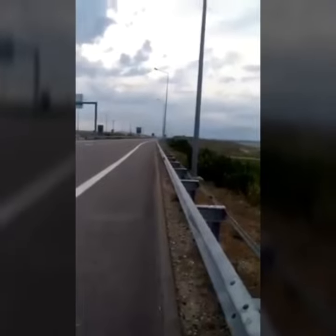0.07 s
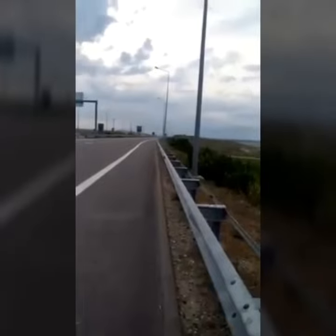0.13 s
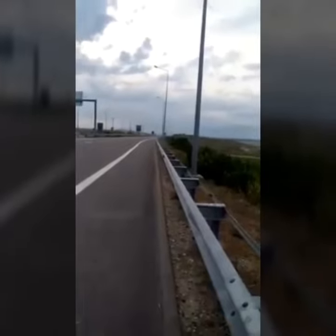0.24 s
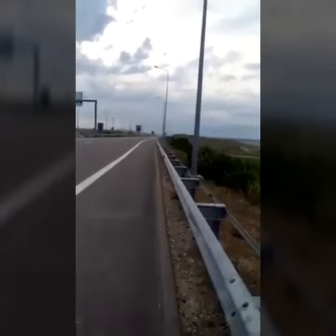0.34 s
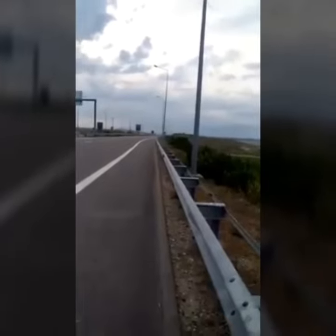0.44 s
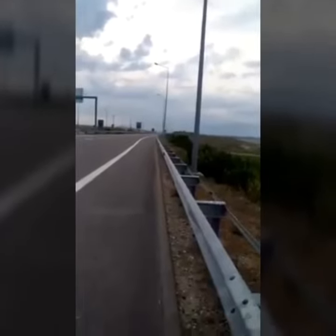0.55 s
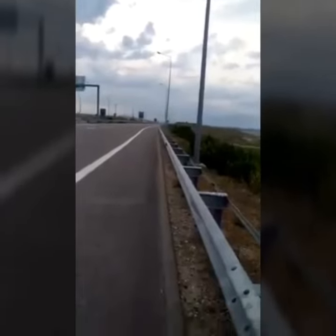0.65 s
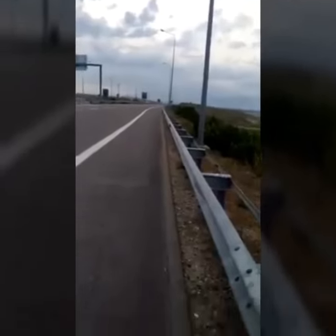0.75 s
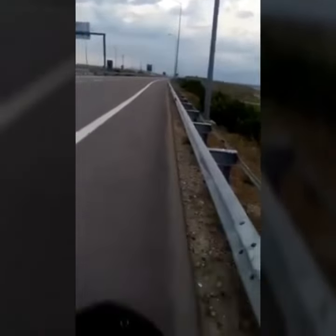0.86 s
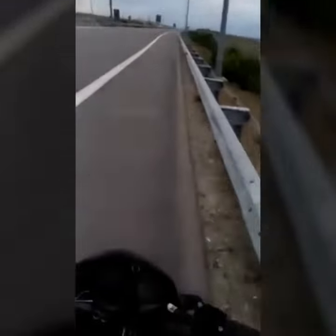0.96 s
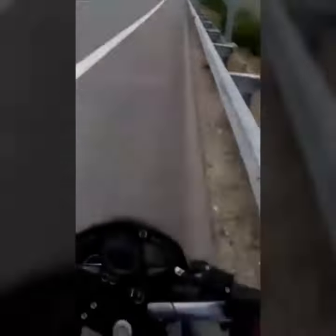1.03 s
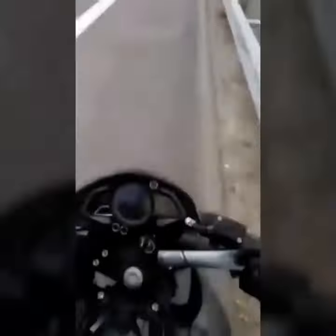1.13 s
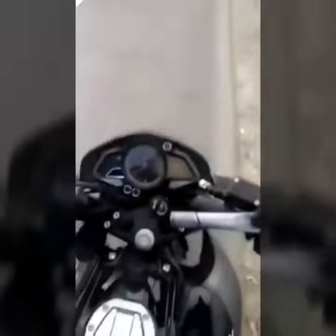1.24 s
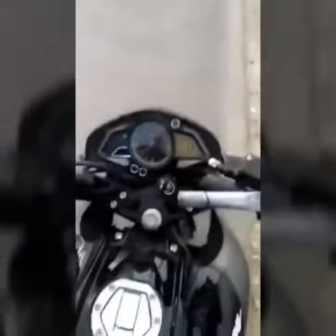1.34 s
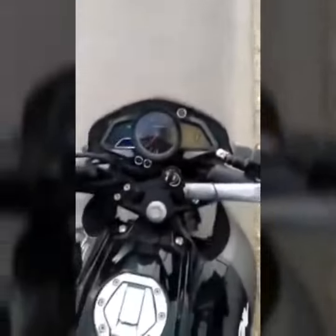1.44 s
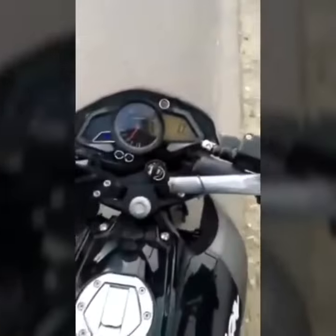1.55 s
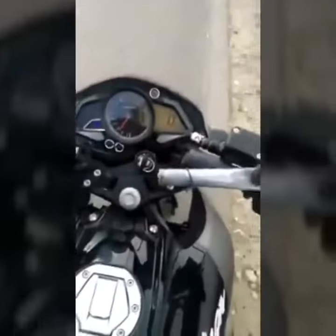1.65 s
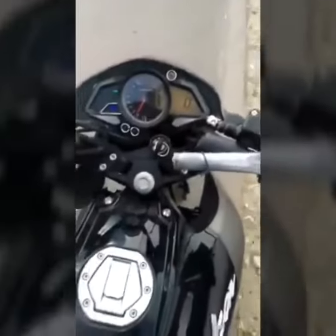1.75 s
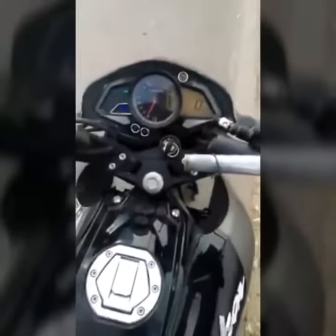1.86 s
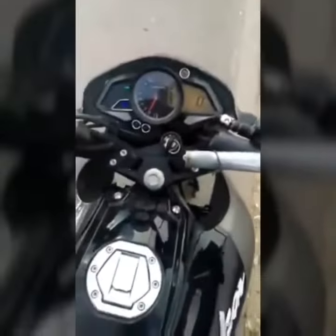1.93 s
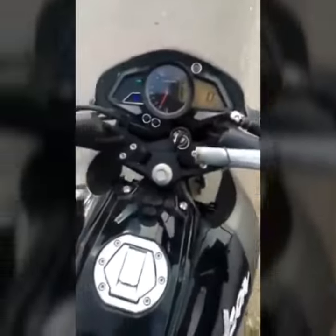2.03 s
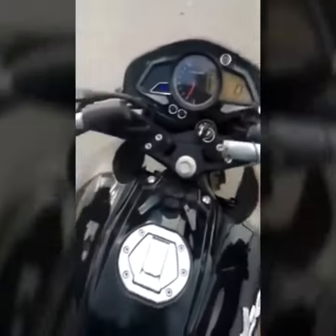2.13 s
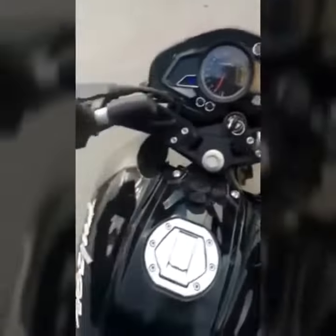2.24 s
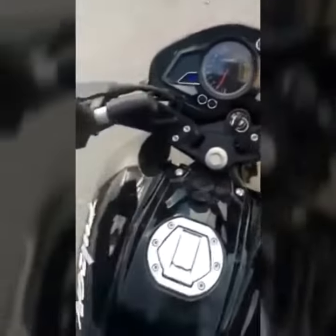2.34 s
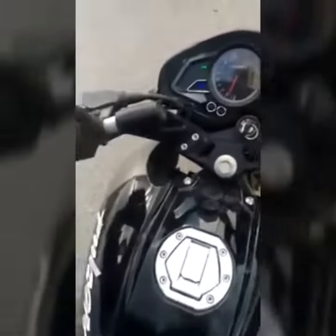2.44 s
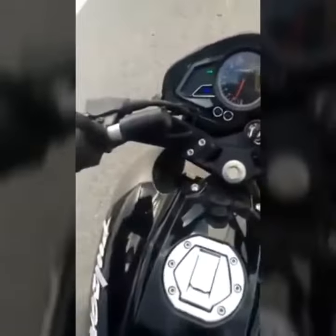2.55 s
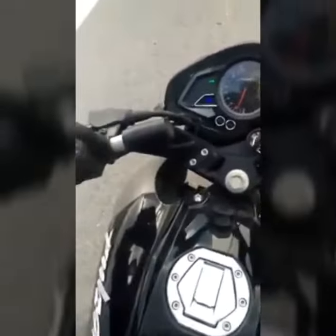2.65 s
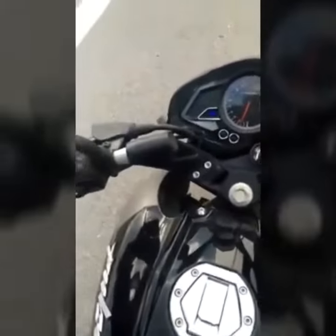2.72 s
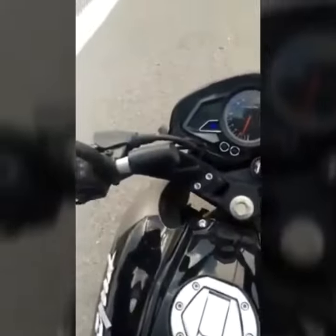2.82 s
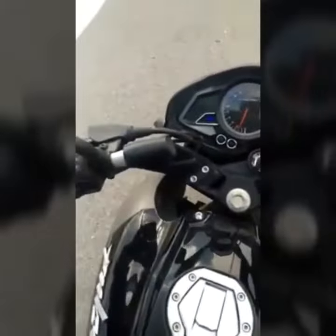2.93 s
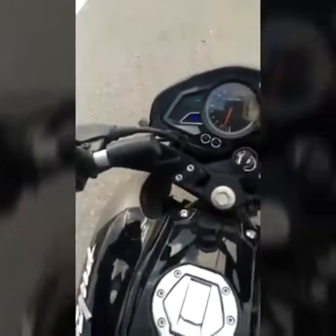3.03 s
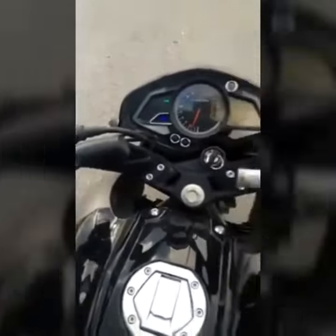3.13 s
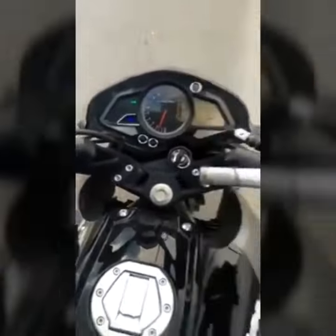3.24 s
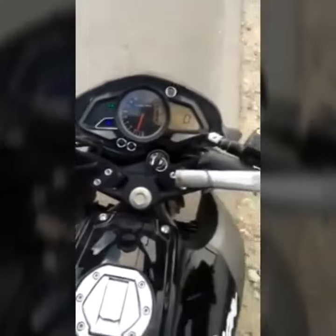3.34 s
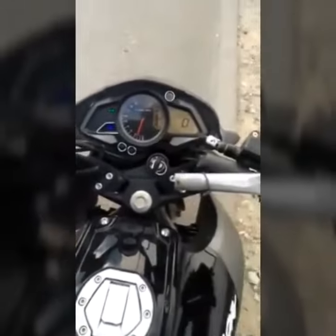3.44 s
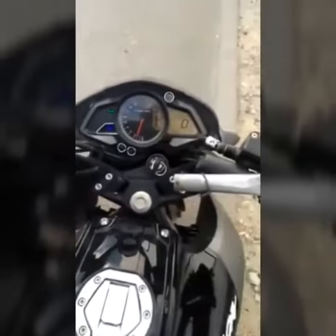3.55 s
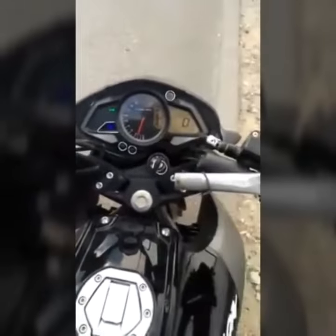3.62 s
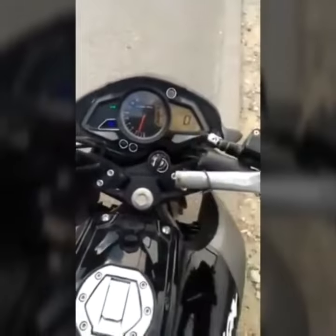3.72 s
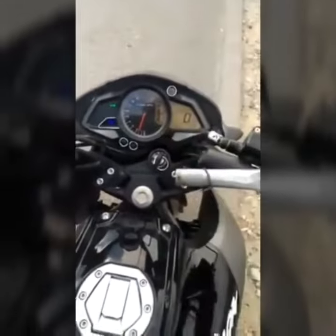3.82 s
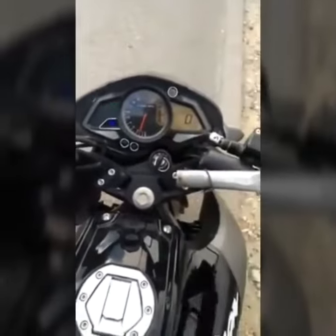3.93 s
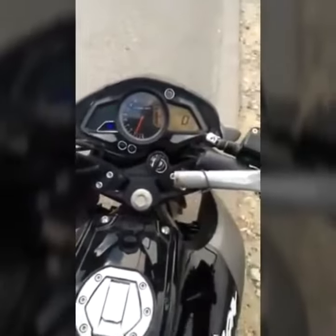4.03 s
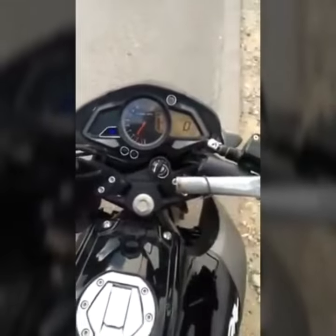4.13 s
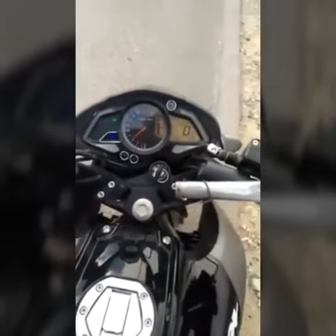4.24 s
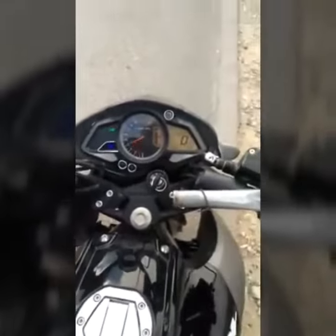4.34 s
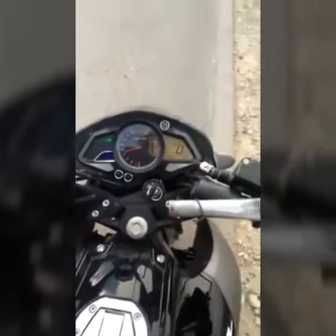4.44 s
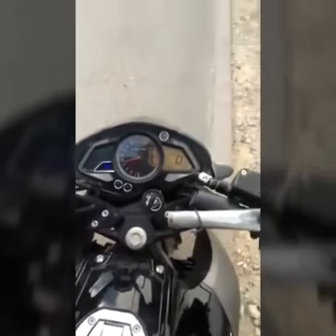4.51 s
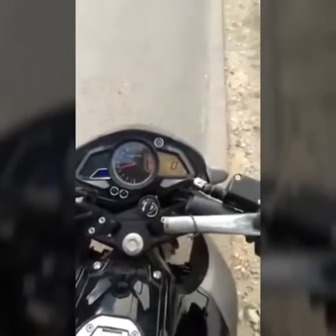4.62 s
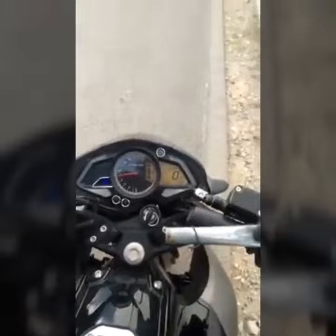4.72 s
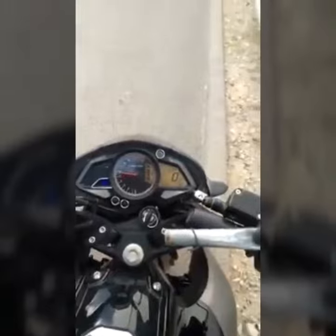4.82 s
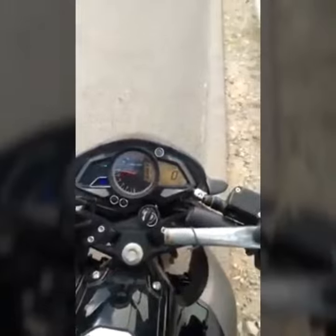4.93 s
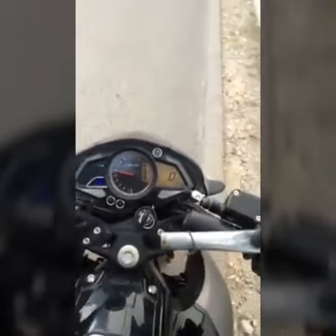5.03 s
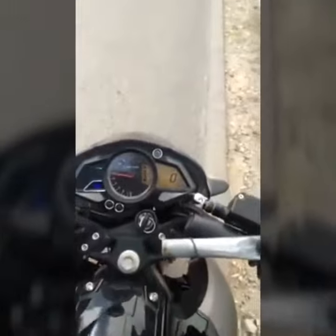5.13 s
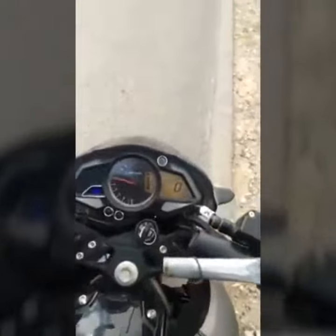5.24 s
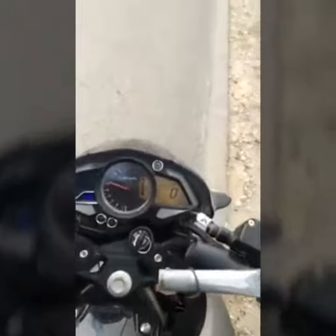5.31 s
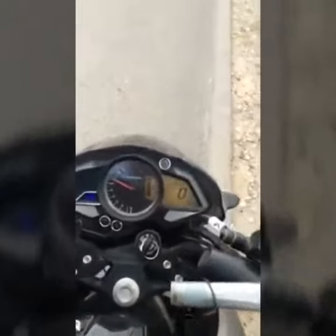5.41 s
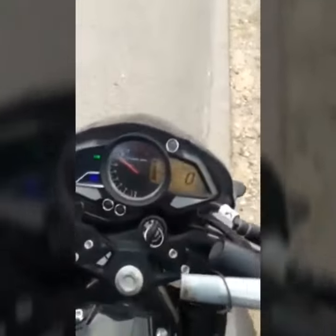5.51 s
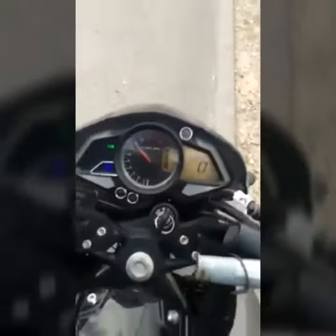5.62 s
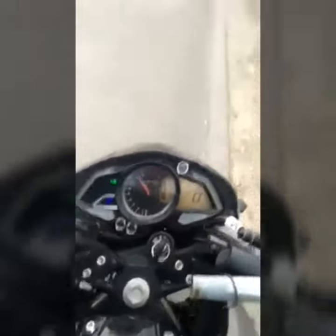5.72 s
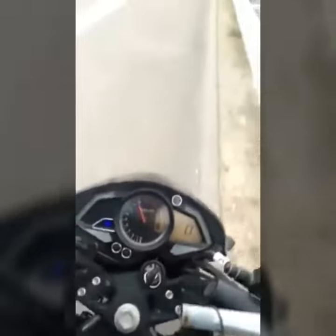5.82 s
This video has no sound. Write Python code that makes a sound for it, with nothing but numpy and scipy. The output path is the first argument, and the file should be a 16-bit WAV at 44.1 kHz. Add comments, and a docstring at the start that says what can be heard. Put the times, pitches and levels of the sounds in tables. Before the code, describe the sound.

A parked single-cylinder motorcycle is heard from the saddle, the microphone close above the engine. It idles with an uneven low thump and metallic valve clatter while puffs of air rustle over the microphone. Then the throttle is blipped about four times, each rev higher and louder, until the engine holds a howl. The sound is narrow and dull on top, and crackles lightly at the peak.

```python
"""In the saddle of a parked single-cylinder motorcycle, one microphone close above the engine.
The revs fall to a thumping idle as the microphone tips down, then four blips of the throttle climb
to a held howl. Firings ring the exhaust, the intake roars when the throttle is open, and piston and
valves clatter on the finned casing. Puffs of air rustle over the microphone at idle; at the top of
the revs the narrow-band recorder overloads and crackles."""
import sys
import numpy as np
from scipy import signal
from scipy.fft import rfft, irfft, next_fast_len
from scipy.io import wavfile
from scipy.ndimage import uniform_filter1d

SR = 44100
rng = np.random.default_rng(int(sys.argv[2]) if len(sys.argv) > 2 else 0)


def unload_wav(signal):
    """Save mono or channel-first audio to the path in sys.argv[1] as 16-bit WAV at rate SR, clipped to [-1, 1]."""
    wavfile.write(
        sys.argv[1],
        SR,
        np.round(np.clip(np.atleast_2d(signal).T, -1, 1) * 32767).astype(np.int16),
    )


N = 258867
TIME = np.arange(N) / SR


def undb(db):
    """Decibels to gain."""
    return 10 ** (np.asarray(db) / 20)


def unit(x):
    """Scale to rms 1."""
    return x / np.sqrt(np.mean(x ** 2))


def steady(x, phase):
    """Scale to rms 1 over every three engine cycles, keeping the shape of each beat."""
    cycle = (phase - np.floor(phase[0])).astype(int)
    length = np.maximum(np.bincount(cycle), 1)
    power = uniform_filter1d(np.bincount(cycle, x ** 2), 3) / uniform_filter1d(length * 1., 3)
    centres_s = np.bincount(cycle, TIME) / length
    return x / np.sqrt(np.interp(TIME, centres_s, power) + 1e-18)


def cut(x, hz, kind, order=4):
    """Low-pass, high-pass or band-pass."""
    return signal.sosfilt(signal.butter(order, hz, kind, fs=SR, output="sos"), x)


def ring(x, modes):
    """Parallel resonances; neighbours swing in opposite senses."""
    return sum((-1) ** k * undb(db) * signal.lfilter(*signal.iirpeak(hz, hz / width, fs=SR), x)
               for k, (hz, width, db) in enumerate(modes))


def colour(x, points):
    """Minimum-phase filter through points of (frequency [Hz], gain [dB])."""
    hz, db = np.transpose(points)
    size = next_fast_len(N // 2 + 4096) * 2
    bins_hz = np.arange(size // 2 + 1) * SR / size
    gain = undb(np.interp(np.log(bins_hz + 1), np.log(hz), db))
    cepstrum = irfft(np.log(gain))
    cepstrum[1:size // 2] *= 2
    cepstrum[size // 2 + 1:] = 0
    return irfft(rfft(x, size) * np.exp(rfft(cepstrum)), size)[:N]


def noise():
    """White noise."""
    return rng.standard_normal(N)


def walk(rate):
    """Random levels held 1 / rate s and slewed twice."""
    hold = int(SR / rate)
    steps = np.repeat(rng.standard_normal(N // hold + 1), hold)
    return unit(uniform_filter1d(uniform_filter1d(steps, hold), hold)[:N])


def pulses(phase, place, scatter_db, jitter_s):
    """One impulse a cycle at the given place, each with its own size and timing."""
    turns = np.arange(np.ceil(phase[0]), np.floor(phase[-1]) + 1) + place
    chance = rng.standard_normal((len(turns), 2))
    at = (np.interp(turns, phase, TIME, right=np.inf) + jitter_s * chance[:, 0]) * SR
    inside = (at > 0) & (at < N - 2)
    at, size = at[inside], undb(scatter_db * chance[inside, 1])
    whole = at.astype(int)
    return np.bincount(whole, size * (1 - at % 1), N) + np.bincount(whole + 1, size * (at % 1), N)


def gate(phase, place, decay):
    """Opens once a cycle and dies away; place and decay are in cycles."""
    return np.exp(-((phase - place) % 1) / decay)


def twist_grip():
    """Each twist opens the throttle quickly, holds it and lets it spring back."""
    # twists of the grip: (opens [s], closes [s], opening [0-1], spring-back time [s])
    twists = [(3.759, 3.971, .75, .056), (4.398, 4.55, .91, .023), (4.913, 5.034, .753, .005),
              (5.126, 5.183, .608, .08), (5.28, 5.393, .596, .024), (5.39, 5.612, .19, .35)]
    attack_s = .04
    return sum(opening * np.clip((TIME - opens) / attack_s, 0, 1)
               * np.exp(-np.maximum(TIME - closes, 0) / back) for opens, closes, opening, back in twists)


def flywheel(opening):
    """Firings per second: the throttle spins the crank up, friction slows it back to idle."""
    # the hunting idle: (time [s], firing rate [Hz])
    idle = [(1.556, 13.63), (1.671, 11.63), (1.972, 11.81), (2.251, 11.31), (2.451, 12.89), (2.649, 12.3),
            (2.847, 11.09), (3.144, 12.66), (3.581, 11.99)]
    pull_hz_per_s, drag_hz_per_s = 230, 43.68
    catch_hz = 2.37  # this near to idle, the idle jet catches the falling revs
    above_idle_hz, track, step = 44.32, [], 44
    for pull in pull_hz_per_s * opening[::step]:
        track.append(above_idle_hz)
        friction = drag_hz_per_s * (above_idle_hz / 40) ** .223
        drag = friction * above_idle_hz / (above_idle_hz + catch_hz)
        above_idle_hz = max(above_idle_hz + (pull - drag) * step / SR, 0)
    return np.interp(TIME, *np.transpose(idle)) + np.interp(TIME, TIME[::step], track)


def microphone_tilt(start_s=.39, length_s=.91):
    """How far the microphone has tipped down towards the engine, 0-1."""
    return np.clip((TIME - start_s) / length_s, 0, 1)


def loudness(hz, opening):
    """Boom, bark and clatter at the saddle, in dB, follow speed, load and the microphone's aim."""
    # throttle shut, microphone aimed ahead; the level peaks where partials meet resonances:
    # (firing rate [Hz], exhaust boom [dB], exhaust bark [dB], clatter [dB])
    speed_levels = [(12.4, -25, -42, -46), (20.9, -21, -36, -41.5), (29.4, -15.5, -32.5, -38),
                    (36.95, -16, -27.5, -32.5), (46, -12.5, -20.5, -29), (52.4, -14, -17.5, -26.5),
                    (57.1, -13, -21.5, -25), (60.1, -7.5, -22, -24), (72.6, -12.5, -9.5, -23),
                    (71.9, -9.5, -12.5, -22.5)]
    full_load_db, aimed_down_db = (2.5, 5.5, 2), (1.84, .86, -.07)
    speeds, *levels = np.transpose(speed_levels)
    return [np.interp(hz, speeds, db) + load_db * opening + tilt_db * microphone_tilt()
            for db, load_db, tilt_db in zip(levels, full_load_db, aimed_down_db)]


def drone(phase, hz):
    """At speed the firings run together into partials that slide through the exhaust's resonances."""
    # partials on a closed throttle: (multiple of the firing rate, relative level [dB])
    partials = [(1, 2), (2, 11), (3, 3), (4, 12), (5, 2.5), (6, 2), (7, 0), (8, 1), (9, 5), (10, -1),
                (11, -5), (12, -4), (13, -5), (14, -11), (15, -4), (16, -12)]
    # how the pipes pass them; even ones beat with every crank turn, odd ones with the firing alone:
    # (frequency [Hz], even gain [dB], odd gain [dB])
    pipe_response = [(25, -13.5, -37), (47.4, 0.5, -3), (80, 2.5, 16.5), (113, -6.5, 1), (150, -7.5, 0.5),
                     (183, 3.5, 3), (220, -2, 9.5), (261, 2.5, -6), (290, 0, -10), (340, 4.5, -6),
                     (380, -1, -5.5), (440, -0.5, -6), (480, 4, -2), (545, 6.5, -14), (624, -5.5, -4.5),
                     (700, -9, -21.5), (900, -16, -29.5)]
    # upper partials take many ways through the pipe and fall out of step: (multiple, spread [cycles])
    spread = [(2, 0), (5, .08), (10, .3)]
    # the silencer's boom with the microphone aimed down: (frequency [Hz], width [Hz], gain [dB])
    down_boom = (250, 22, 6.1)
    boom_hz, boom_width, boom_db = down_boom
    pipe_hz, *passed_db = np.transpose(pipe_response)
    crank = phase - .25 + .005 * walk(50)
    step, tone = 64, 0
    rate, down = hz[::step], microphone_tilt()[::step]
    for k, db in partials:
        passed = np.interp(np.log(k * rate), np.log(pipe_hz), passed_db[k % 2])
        boom = boom_db * down * np.exp(-((k * rate - boom_hz) / boom_width) ** 2)
        gain = np.interp(TIME, TIME[::step], undb(db + passed + boom))
        # the low partials stay nearly in step, so each cycle keeps one sharp crest
        lead = .024 * k ** 2 + 1 / 16 + np.interp(k, *np.transpose(spread)) * rng.standard_normal()
        flutter = 1 + .25 * walk(30)
        tone += gain * flutter * np.cos(2 * np.pi * (k * crank + lead))
    return steady(tone, phase)


def casing(x):
    """The finned casing colours the engine's noises, differently as the microphone tips down."""
    # heard from the saddle: (frequency [Hz], gain aimed ahead [dB], gain aimed down [dB])
    casing_response = [(443, -22, -18.5), (660, 4.5, -4), (810, -10, -6.5), (986, -3, 0.5),
                       (1230, -3.5, -4), (1340, -1, 1.5), (1950, -1, -2), (2217, -0.5, 4.5),
                       (2350, -4.5, -11), (2510, -20, -5.5), (2570, -12, -4.5), (2870, 1.5, -5),
                       (2960, -12, -1.5), (3060, -13.5, -7.5), (3250, -12, -16), (3570, -15, -9.5),
                       (3790, -22.5, -12.5), (4270, -13.5, -13.5), (4500, -22, -29)]
    points, down = np.array(casing_response), microphone_tilt()
    return (1 - down) * colour(x, points[:, [0, 1]]) + down * colour(x, points[:, [0, 2]])


def clatter(phase, hz, clatter_db):
    """Piston and valves knock on the casing, over a throbbing hiss of chain and gas."""
    # knocks within one cycle: (place [cycles], relative size)
    cycle_knocks = [(.03, 0.45), (.31, 0.67), (0.578, 0.43), (0.859, 0.94)]
    # rings of the knocked casing: (frequency [Hz], width [Hz], gain [dB])
    casing_modes = [(950, 160, 5), (2100, 190, -1.5), (2830, 28, 2), (2832, 71, 1), (3470, 30, -8.5),
                    (4632, 13, -14)]
    knocks = sum(size * pulses(phase, place, scatter_db=1.8, jitter_s=.00004)
                 for place, size in cycle_knocks)
    # the cooling fins smear each knock into a short ring
    fins = noise()[:SR // 20] * np.exp(-TIME[:SR // 20] / .027)
    knocks = signal.fftconvolve(knocks, fins)[:N]
    hiss = noise() * (3.8 + gate(phase, -.026, decay=.47))
    knock_share = .4 + .45 * hz / np.max(hz)
    blows = steady(knocks, phase) * np.sqrt(knock_share) + steady(hiss, phase) * np.sqrt(1 - knock_share)
    metal = steady(casing(blows), phase) + undb(-12) * steady(ring(blows, casing_modes), phase)
    return unit(cut(metal, 480, "high")) * undb(clatter_db)


def thumps(phase, hz, throttle):
    """Each firing thumps into the silencer; the piston pumps another puff later in the cycle."""
    # uneven firings at idle, most of them weak: (time [s], change in the low thump [dB])
    misfires = [(1.222, -13), (1.4, 2), (1.602, -11), (1.768, -19), (3.513, -18)]
    # low resonances of the silencer: (frequency [Hz], width [Hz], gain [dB])
    silencer_modes = [(80, 28, 3.5), (193, 17, -3), (215.5, 5.7, 3.5), (304.5, 30, -3.5)]
    # upper resonances of the pipe: (frequency [Hz], width [Hz], gain [dB])
    pipe_modes = [(392, 26, 3), (430, 65, 4.5), (519, 180, 3), (560, 56, -29)]
    pace = hz / np.max(hz)
    firings = pulses(phase, 0, scatter_db=2.6, jitter_s=.0006)
    puffs = firings + 1.1 * pace ** 2 * pulses(phase, .72, scatter_db=10.5, jitter_s=.00023)
    # part of each puff comes back from the far end of the pipe
    puffs = puffs + .13 * np.interp(TIME - .0125, TIME, puffs, left=0)
    turbulence = unit(noise() * gate(phase, 0, decay=.55)) * np.sqrt(hz / SR)
    flow = puffs + turbulence * (.5 + 1.5 * pace + .3 * throttle)
    # a slow engine opens its valve slowly, so its puffs are dull and round
    pipe_flow = pace * flow + (1 - pace) * cut(flow, 390, "low", order=2)
    misfire_db = sum(db * (np.floor(phase) == np.round(np.interp(s, TIME, phase))) for s, db in misfires)
    thump = cut(firings, [55.5, 115], "band", order=3) * (1 - pace) * undb(misfire_db - 6)
    boom = cut(cut(ring(flow, silencer_modes), 40, "high", order=2), 480, "low")
    bark = cut(cut(ring(pipe_flow, pipe_modes), 310, "high"), 680, "low", order=6)
    return steady(thump + (boom + undb(-1.5) * bark) * undb(.091 * misfire_db), phase)


def crack(phase, hz, opening, clatter_db):
    """At low revs each combustion cracks against the casing, hardest with the throttle open."""
    burst = unit(cut(casing(noise()), 590, "high")) * gate(phase, -.14, decay=.89)
    slowness = 1 - hz / np.max(hz)
    return burst * slowness ** 2 * undb(clatter_db - 1 + 19 * opening)


def air():
    """Uneven puffs of air rustle right on the microphone; each swells, holds and dies away."""
    # puffs during the idle: (time [s], length [s], release [s], rush level [dB], hiss level [dB])
    puffs = [(1.34, 0.13, 0.028, -34.5, -64), (1.473, 0.049, 0.081, -28.5, -37),
             (1.548, 0.18, 0.026, -37.5, -49.5), (1.678, 0.085, 0.067, -30.5, -54),
             (1.937, 0.05, 0.016, -36.5, -45), (1.979, 0.048, 0.029, -33.5, -54),
             (2.071, 0.1, 0.059, -33.5, -44.5), (2.169, 0.055, 0.007, -27, -44),
             (2.33, 0.16, .04, -26.5, -43.5), (2.4, 0.086, 0.038, -24.5, -43),
             (2.504, 0.2, 0.092, -27.5, -42.5), (2.668, 0.1, 0.028, -35, -35),
             (2.929, 0.16, .03, -33.5, -45), (3.016, 0.16, 0.036, -30, -36),
             (3.142, 0.071, 0.45, -38.5, -59)]
    # colour of the rustle: (frequency [Hz], gain [dB])
    rustle_colour = [(120, -3.5), (250, 8), (460, 3.5), (700, -2.5), (980, -1.5), (1400, -5.5),
                     (2000, -11.5), (2400, -11), (2700, -7.5), (3300, -11.5), (4400, -17)]
    attack_s = .016
    rush = hiss = 0
    for s, length, release, rush_db, hiss_db in puffs:
        swell = np.clip((TIME - s) / attack_s, 0, 1) * np.exp(-np.maximum(TIME - s - length, 0) / release)
        rush = np.maximum(rush, swell * undb(rush_db))
        hiss = np.maximum(hiss, swell * undb(hiss_db))
    eddies = undb(2.2 * walk(130))
    rustle = cut(colour(noise() * eddies, rustle_colour), 150, "high")
    return rush * unit(cut(rustle, 2300, "low")) + hiss * unit(cut(rustle, 1500, "high"))


def intake(phase, hz):
    """Each gulp of air makes the airbox bark."""
    # airbox resonances: (frequency [Hz], width [Hz], gain [dB])
    airbox_modes = [(276, 170, -6.5), (483, 190, -3.5), (615, 45, -0.5)]
    gulps = pulses(phase, .05, scatter_db=1, jitter_s=.0003)
    suction = 2.1 * unit(noise() * gate(phase, .05, decay=.3)) * np.sqrt(hz / SR)
    bark = ring(gulps + suction, airbox_modes)
    return steady(cut(cut(bark, 720, "low", order=8), 160, "high"), phase)


def howl(phase):
    """At the top the pipe rings through the whole cycle; its upper partials flutter most."""
    # partials of the howl: (multiple of the firing rate, relative level [dB])
    partials = [(1, -8.5), (2, -6), (3, -6.5), (4, 2.5), (5, -26), (6, -3.5), (7, -6), (8, -5), (9, -14),
                (10, -30), (11, -23), (12, -21), (13, -16.5), (14, -27), (15, -20), (19, -24), (24, -27),
                (26, -27)]
    crank = phase + .003 * walk(50)
    tone = 0
    for k, db in partials:
        flutter = 1 + min(.08 + .002 * k ** 2, .5) * walk(45)
        tone += undb(db) * flutter * np.sin(2 * np.pi * (k * crank - .1 * k ** 2))
    return steady(tone, phase)


def exhaust_and_intake(phase, hz, opening, boom_db, bark_db):
    """With rising revs thumps merge into a drone, then lock into a howl; throttle roughens the drone."""
    # how far the firings run together, throttle shut: (firing rate [Hz], share [0-1])
    merging = [(17, 0), (23, .45), (30, .85), (42, .97)]
    throttle = np.clip(opening / .75, 0, 1)  # the flow is roughest from three quarters open
    pace = hz / np.max(hz)
    howl_share = np.interp(hz, [60, 71.2], [0, .91])
    merged = np.interp(hz, *np.transpose(merging)) * (1 - throttle ** 3 * (1 - .5 * pace ** 2))
    tone_share = merged + (1 - merged) * howl_share
    rough = thumps(phase, hz, throttle) + undb(2.5) * pace * throttle * intake(phase, hz)
    tone = np.sqrt(1 - howl_share) * drone(phase, hz) + np.sqrt(howl_share) * howl(phase)
    gas = np.sqrt(1 - tone_share) * steady(rough, phase) + np.sqrt(tone_share) * tone
    boom = signal.sosfiltfilt(signal.butter(8, 350, fs=SR, output="sos"), gas)
    bark = gas - boom
    return steady(boom, phase) * undb(boom_db) + steady(bark, phase) * undb(bark_db)


def ticks(decay_s=.00005):
    """A few lone, sharp ticks."""
    # ticks: (time [s], height [full scale = 1])
    tick_list = [(4.543, .03), (4.555, .015), (4.7405, .7)]
    clicks = sum(height * (np.arange(N) == int(s * SR)) for s, height in tick_list)
    return signal.lfilter([1], [1, -np.exp(-1 / (decay_s * SR))], clicks)


def overload_crackle(x):
    """Under lasting overload the wave's deep troughs crackle raggedly."""
    trough_depth, excess_limit, overload_rms = .55, .12, [.38, .47]
    rms = np.sqrt(np.abs(uniform_filter1d(x ** 2, SR // 10)))
    excess = np.clip(-trough_depth - x, 0, excess_limit) * np.interp(rms, overload_rms, [0, 1])
    return cut(excess * noise() * undb(-25 + 6 * walk(120)), 7200, "low", order=2)


def scene():
    """Mono from the saddle: the throttle drives the crank, and the crank drives every engine sound."""
    opening = twist_grip()
    hz = flywheel(opening)
    boom_db, bark_db, clatter_db = loudness(hz, opening)
    phase = np.cumsum(hz) / SR  # engine cycles, one firing each
    phase -= np.interp(1.85, TIME, phase)  # an idle firing falls at 1.85 s
    engine = exhaust_and_intake(phase, hz, opening, boom_db, bark_db)
    engine += clatter(phase, hz, clatter_db)
    engine += crack(phase, hz, opening, clatter_db)
    return (engine + air())[None]


def record(dry):
    """A narrow-band recorder rounds the loud peaks; crackle and ticks reach above its band."""
    band_hz, top_hz = 4520, 15700
    rounded = 1.03 * dry / (1 + np.abs(dry / 1.05) ** 6) ** (1 / 6)
    narrow = signal.sosfilt(signal.ellip(10, .3, 80, band_hz, fs=SR, output="sos"), rounded)
    crackle = cut(overload_crackle(narrow), band_hz, "high", order=2)
    return signal.sosfilt(signal.ellip(8, .2, 70, top_hz, fs=SR, output="sos"), narrow + crackle + ticks())


dry = scene()
out = record(dry)
unload_wav(out)
```